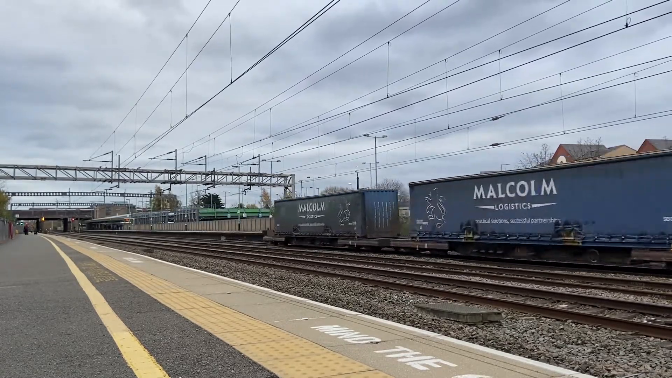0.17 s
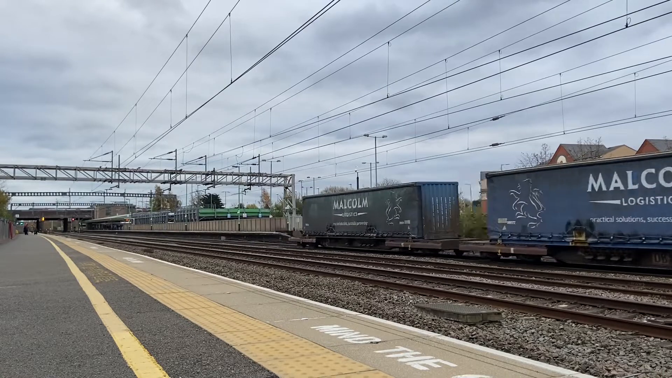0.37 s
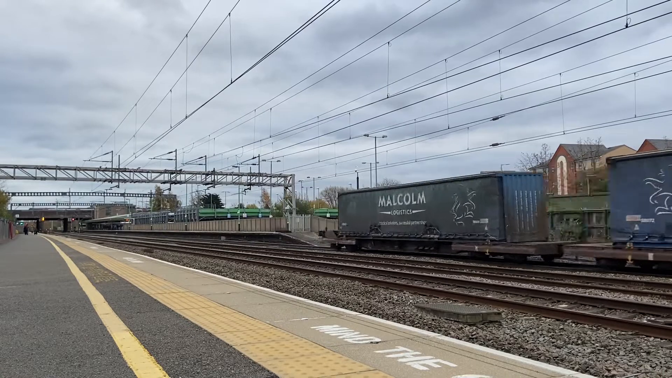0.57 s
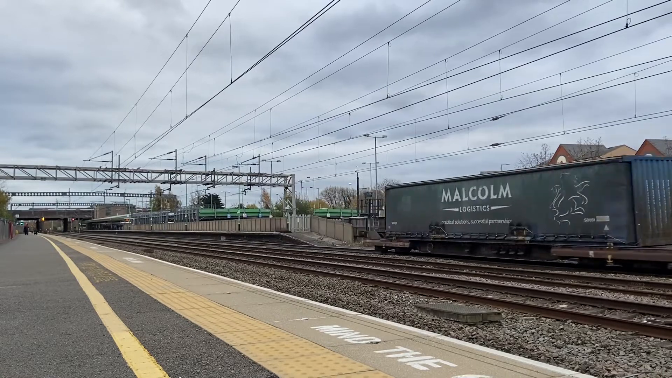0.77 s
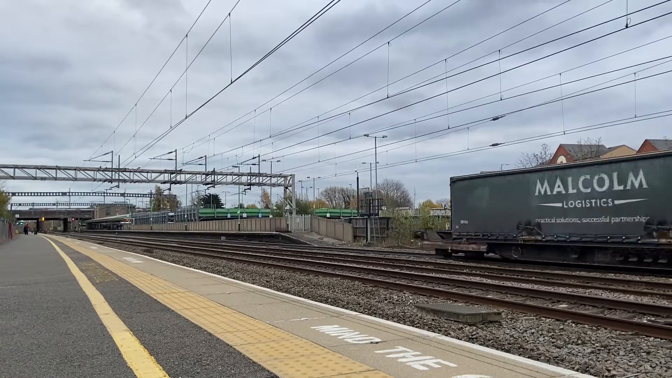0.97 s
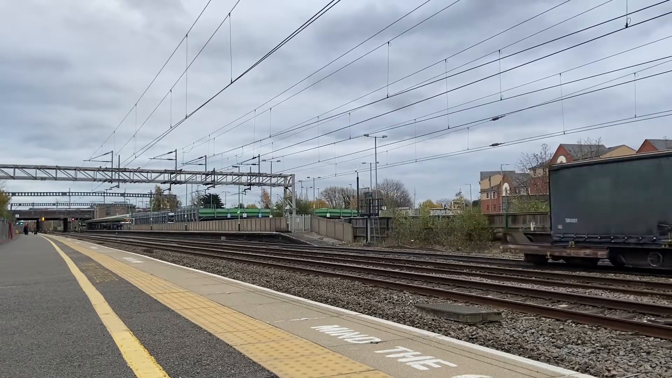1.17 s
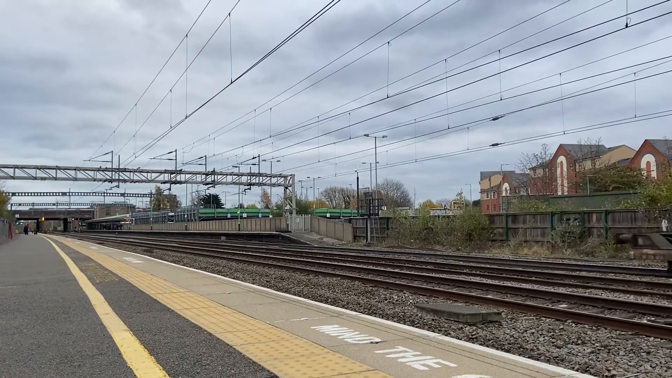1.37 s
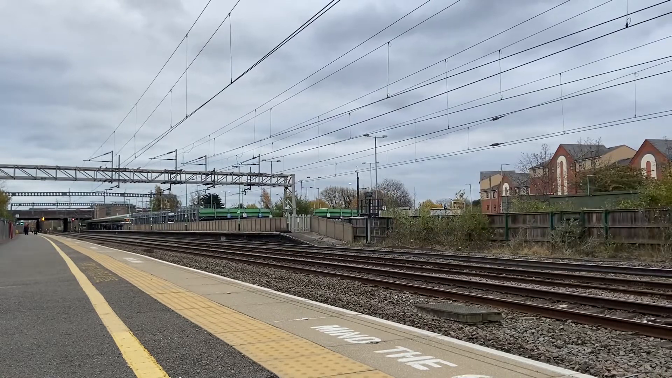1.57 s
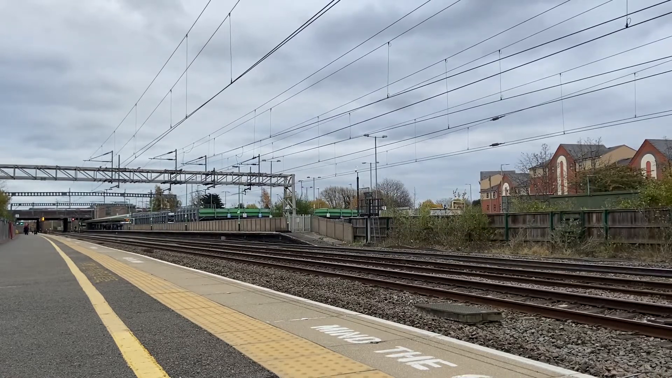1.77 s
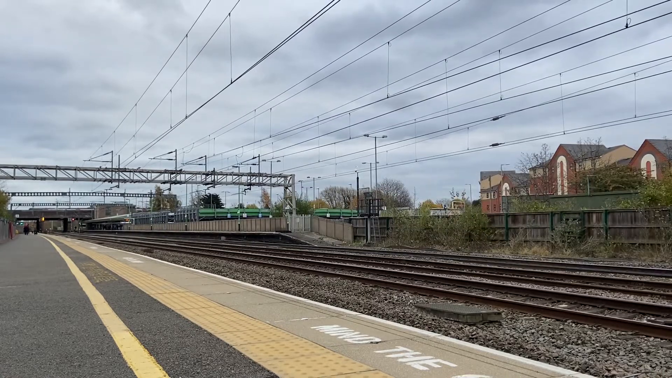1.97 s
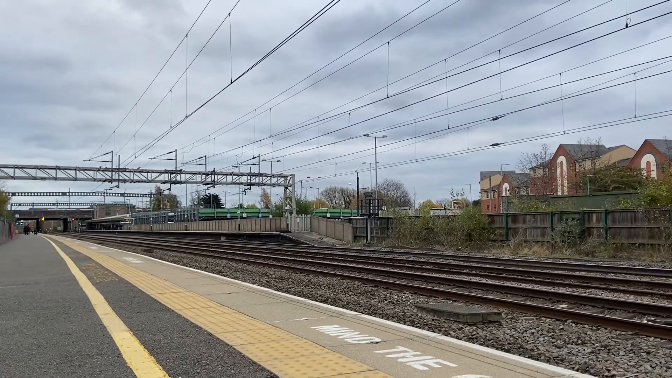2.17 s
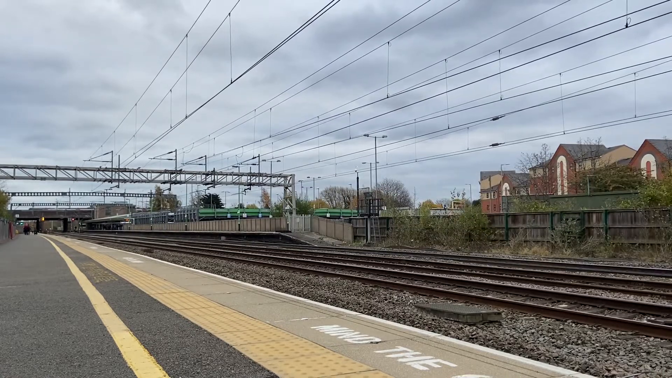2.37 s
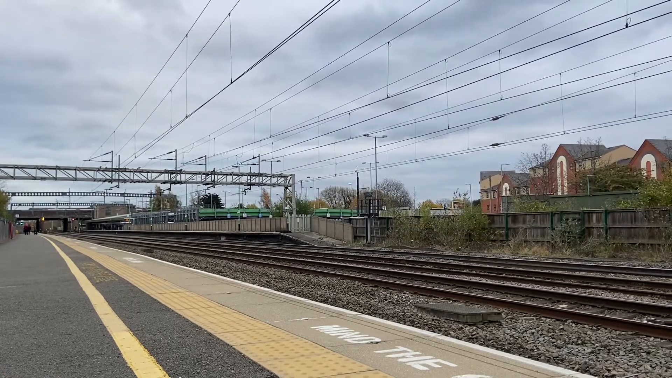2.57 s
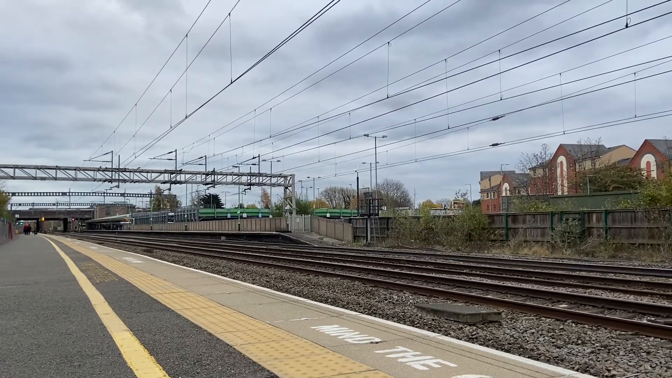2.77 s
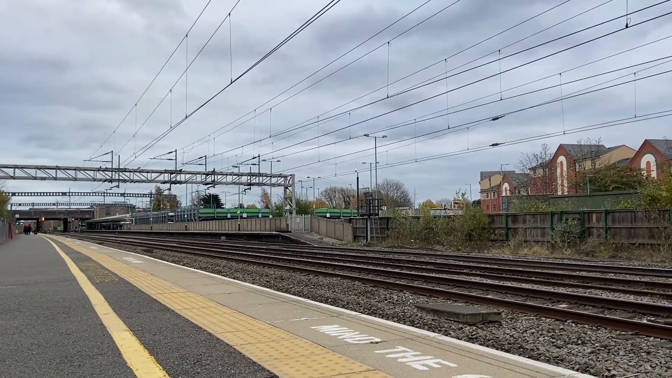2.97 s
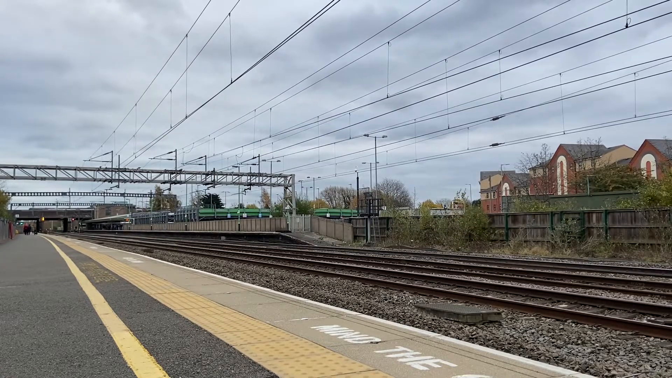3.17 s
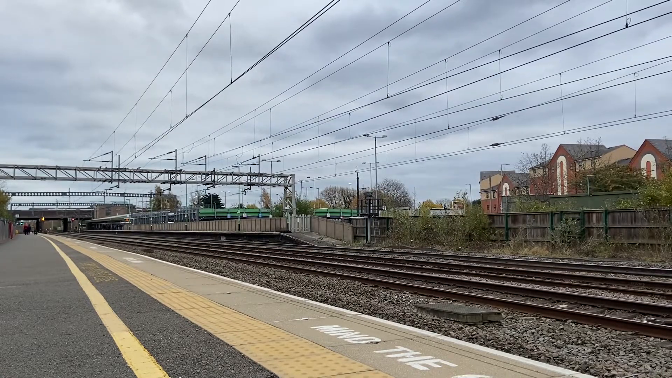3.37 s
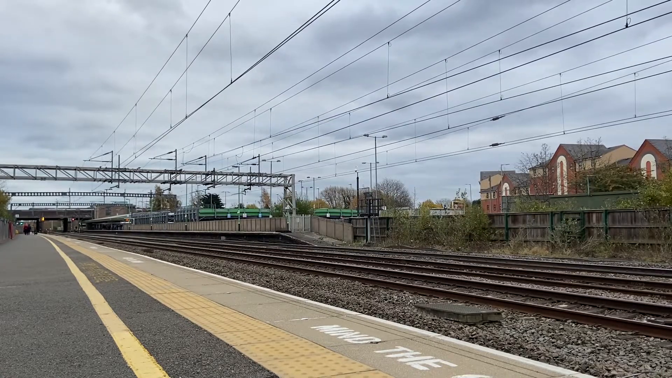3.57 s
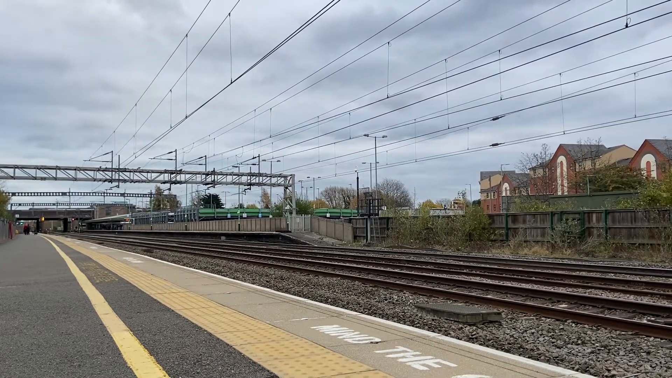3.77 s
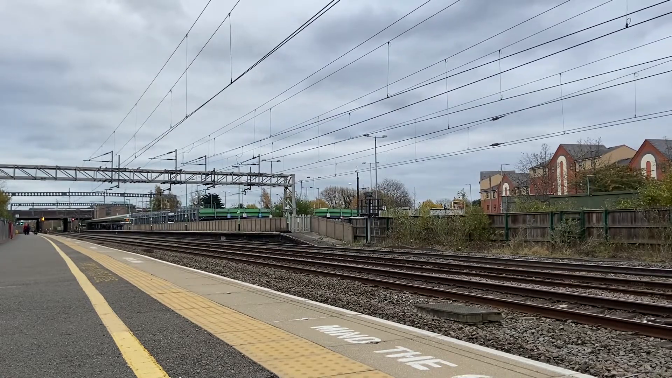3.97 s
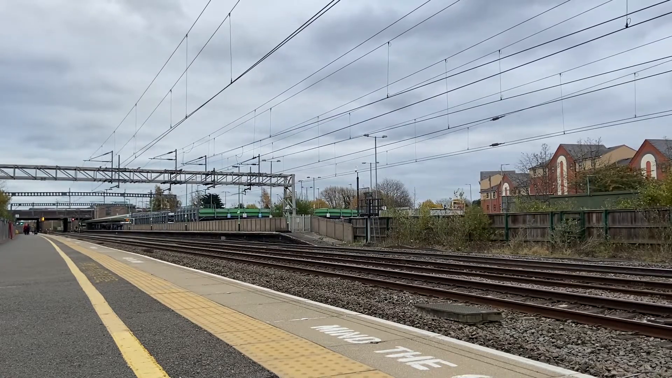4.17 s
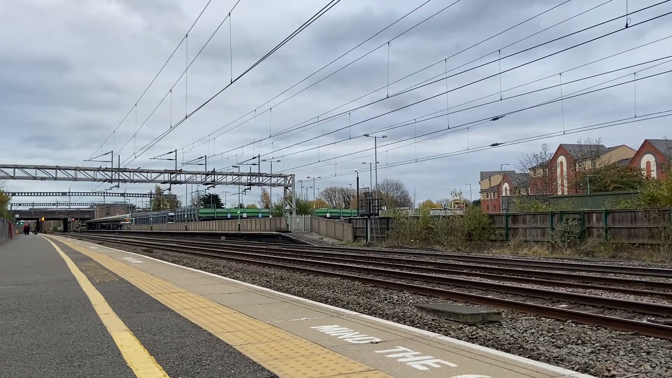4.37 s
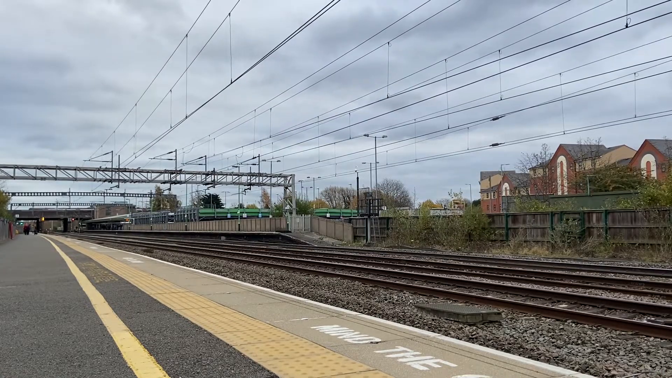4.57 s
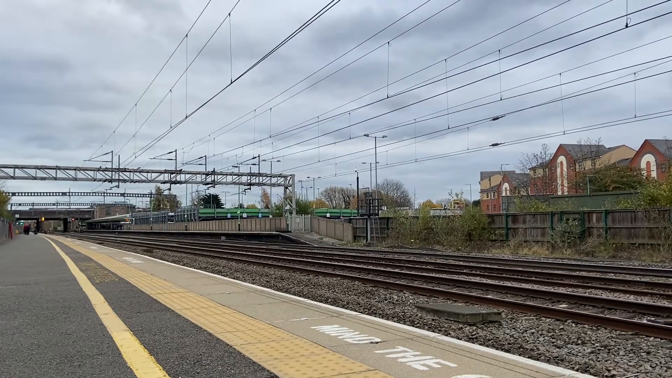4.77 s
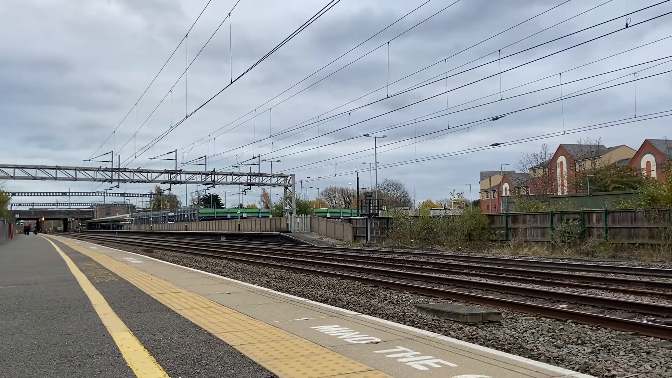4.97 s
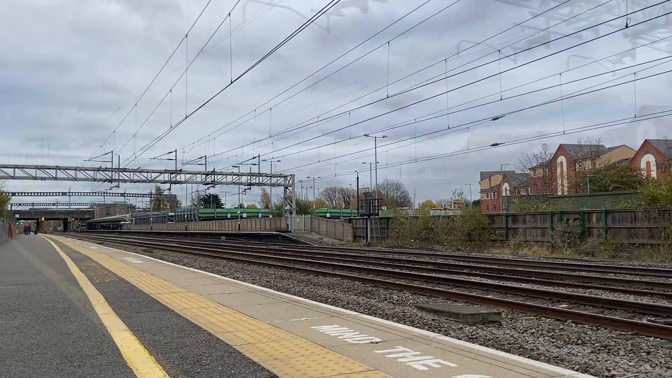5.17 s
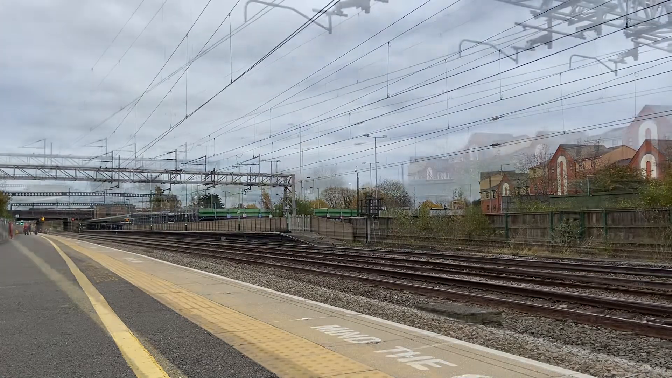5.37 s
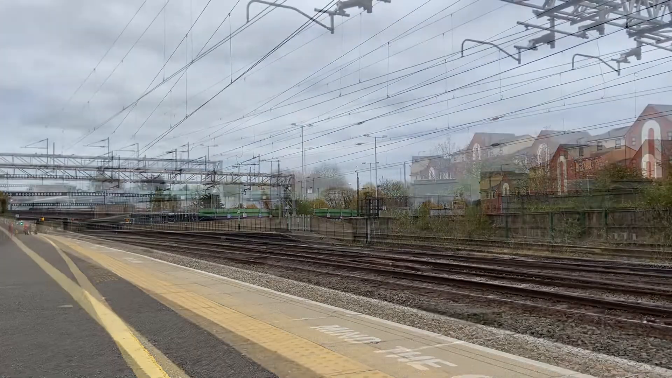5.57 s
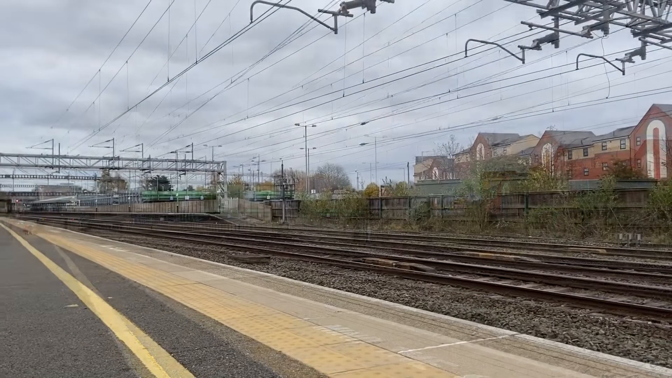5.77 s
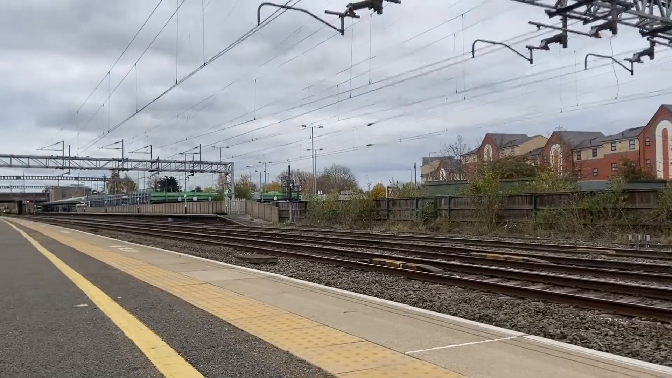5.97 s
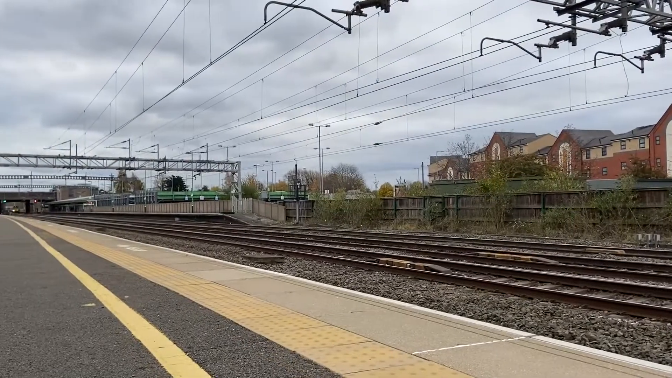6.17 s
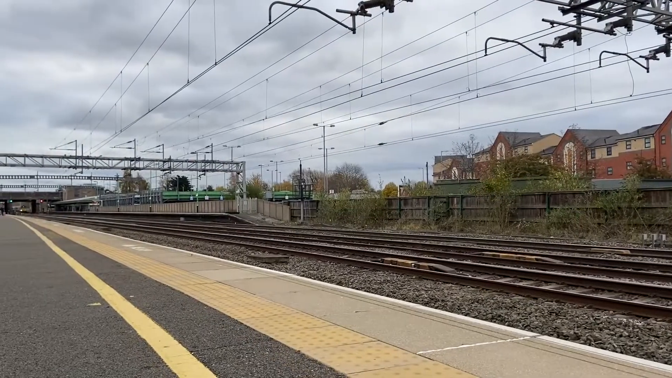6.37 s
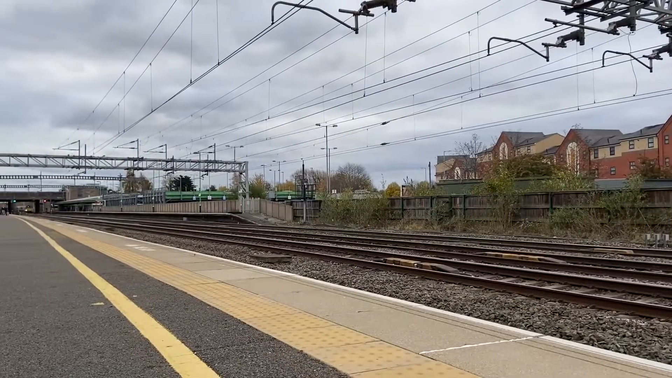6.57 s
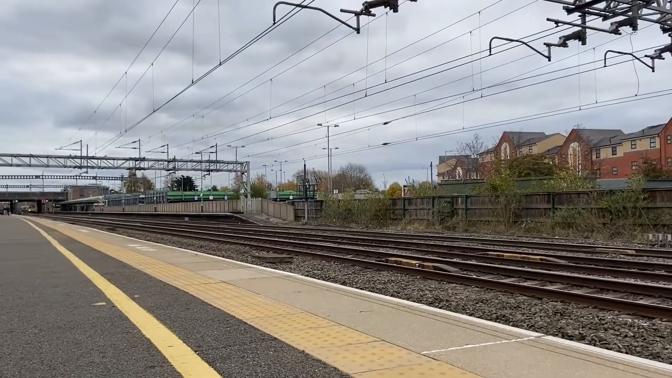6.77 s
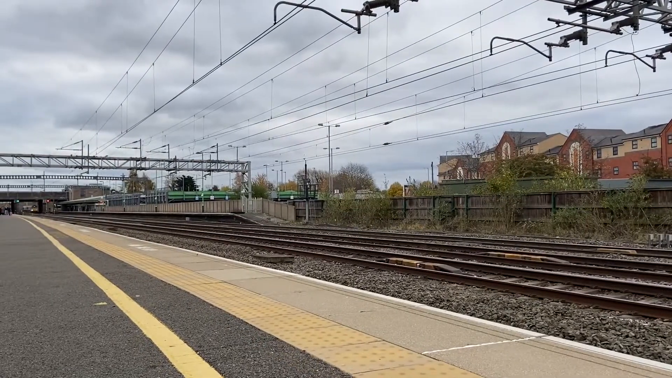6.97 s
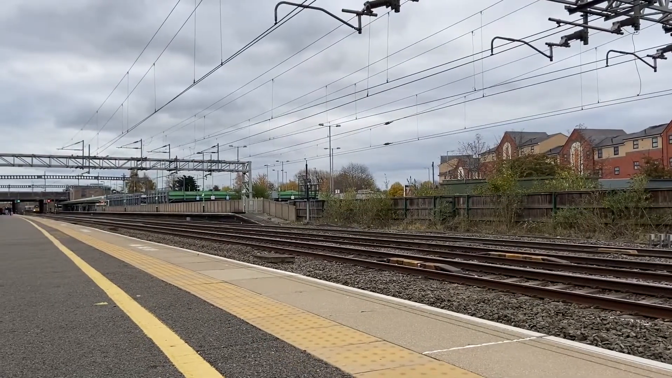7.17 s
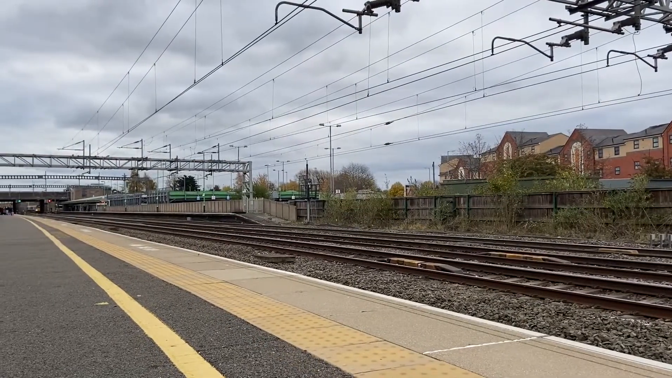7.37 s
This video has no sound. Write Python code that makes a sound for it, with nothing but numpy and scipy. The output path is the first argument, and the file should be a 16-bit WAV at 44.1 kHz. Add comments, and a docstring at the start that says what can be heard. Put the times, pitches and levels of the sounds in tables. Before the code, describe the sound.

Heavy wagon roar with dull wheel thumps peaks and rolls away, leaving faint station rumble, one close gritty footstep scuff and rising rail hiss.

```python
"""On a station platform, the last wagons of a freight train roll past and away to the right; the scene
then fades into the quiet station, where a shoe scuffs on grit close by and the rails begin to hiss ahead
of another train. Rolling is shaped noise, resonances are noise in narrow or broad modes, thumps are short
sines, and the shoe is a sum of decaying modes with sprays and short bands of filtered noise.
Two microphone ports a hand apart hear it all, the right one first."""
import sys
import numpy as np
from scipy import signal
from scipy.io import wavfile
from scipy.ndimage import uniform_filter1d

SR = 44100
rng = np.random.default_rng(int(sys.argv[2]) if len(sys.argv) > 2 else 0)


def file_out(sig):
    """Save sig as 16-bit WAV at sys.argv[1]."""
    # one column per channel
    cols = np.atleast_2d(sig).T
    # limit, then scale
    lim = np.clip(cols, -1, 1)
    pcm = np.round(lim * 32767).astype(np.int16)
    wavfile.write(sys.argv[1], SR, pcm)


N = 327651


def amp(db):
    """Decibel law: twenty decibels are a factor of ten in amplitude."""
    return 10 ** (np.asarray(db) / 20)


def evened(x):
    """Normalisation: scales a signal to unit root-mean-square."""
    return x / np.sqrt(np.mean(abs(x) ** 2) + 1e-20)


def columns(table, at, warp=np.asarray):
    """Interpolation: reads every column of a table at the given places."""
    first, *rest = np.transpose(table)
    return np.array([np.interp(warp(at), warp(first), column) for column in rest])


def add(mix, start_s, sound):
    """Superposition: adds a two-port sound to the mix, cut at its ends."""
    start = round(start_s * SR)
    part = mix[:, max(start, 0):start + sound.shape[1]]
    part += sound[:, max(-start, 0):][:, :part.shape[1]]


# How the two ports differ, for wagons alongside and for sound from far along the track.
# Columns: pitch_hz [Hz], likeness [0-1], left_lead [rad], left_minus_right [dB]
PORTS_ALONGSIDE = [(20, .97, -.1, 0), (90, .95, -.3, -.6), (170, .9, -.6, -1.4), (260, .82, -.9, -1.2),
                   (500, .71, -2.0, -1.5), (800, .76, -2.4, -2), (1500, .6, -2.8, -.5),
                   (1850, .3, -4.4, .3), (2300, .52, -5.9, .3), (3300, .3, -6.3, .3),
                   (5000, .35, -6.3, -.5), (8000, .3, -7.5, -.5), (9500, .5, -6.6, 0),
                   (11500, .92, -6.3, 0)]
PORTS_ALONG_TRACK = [(20, .96, -.1, 0), (90, .93, -.35, -.3), (260, .82, -1.2, -2), (500, .86, -2.4, -3),
                     (800, .76, -2.8, -4), (1300, .62, -3.2, -4), (2100, .5, -4.9, -2),
                     (3000, .25, -5.6, -.5), (6000, .25, -6.3, .3), (8500, .9, -6.3, 0)]


def ports_at(hz, near):
    """Spatial coherence: likeness, phase lead and balance of the ports, between near and far."""
    near_values = columns(PORTS_ALONGSIDE, hz, np.log1p)
    far_values = columns(PORTS_ALONG_TRACK, hz, np.log1p)
    return [near * a + (1 - near) * b for a, b in zip(near_values, far_values)]


# The freight train passes and recedes.
# Columns: time_s [s], level_db [dB relative to its loudest]
TRAIN_LEVEL = [(0, -2.5), (.6, -1), (1.15, 0), (1.6, -3), (1.9, -7.5), (2.4, -11.5), (3.0, -14.5),
               (4.2, -18.5), (5.0, -20), (5.9, -17)]
FADE_S = (5.07, 5.68)  # the freight scene fades into the station
NEAR_DB, NEAR_SPAN_DB = -3, 16  # above the first the colour is alongside; it turns far off over the span
STATION_NEAR = 0.45  # share of the near port pattern in the station (0-1)


def shares(t):
    """Distance cue by level: shares (0-1) of the near pattern and of the station."""
    station = np.interp(t, FADE_S, (0, 1))
    near = np.clip(1 + (columns(TRAIN_LEVEL, t)[0] - NEAR_DB) / NEAR_SPAN_DB, 0, 1)
    return (1 - station) * near + station * STATION_NEAR, station


def levels(parts, t):
    """Addition of powers: the freight train fading out, plus the station fading in and growing."""
    station = shares(t)[1]
    gains = []
    for top_db, fall_share, later_s, station_db, rise in parts:
        freight_db = top_db + fall_share * columns(TRAIN_LEVEL, t - later_s)[0]
        freight_gain = (1 - station) * amp(freight_db)
        station_gain = station * amp(station_db + rise * (t - FADE_S[1]))
        gains.append(np.hypot(freight_gain, station_gain))
    return gains


# Colour of the noise: wagons alongside, wagons far off, station afterwards.
# Columns: pitch_hz [Hz], density_db [relative dB per Hz; each slice is then set to its own level]
COLOUR_ALONGSIDE = [(15, -36), (28, 4), (59, 10), (86, 10.5), (123, -5.5), (162, -3.5), (237, -4.5),
                    (329, -13.5), (500, -15.5), (775, -19), (1000, -20), (1280, -27), (2240, -24.5),
                    (3100, -28.5), (3520, -30), (4050, -32.5), (6780, -38), (8300, -45.5), (10000, -28),
                    (14800, -49)]
COLOUR_FAR_OFF = [(15, -32), (28, -6.5), (65, 0.5), (108, -13.5), (204, -11.5), (262, -18), (430, -20),
                  (780, -18), (950, -21.5), (1220, -27), (2020, -24), (2950, -31.5), (3400, -30.5),
                  (6290, -35), (8300, -41.5), (14800, -34)]
COLOUR_STATION = [(15, -38), (28, -9), (59, -7.5), (133, -14), (171, -11.5), (260, -15.5), (373, -21),
                  (800, -20), (1300, -26), (2180, -26), (2550, -32.5), (3800, -36.5), (6800, -36),
                  (8300, -51), (14800, -39)]


def band(size, edges_hz, parts, ring_db, waver_db):
    """Short-time synthesis: dense noise, one part for each slice; long frames resolve the bass."""
    hop, bins = size // 4, np.fft.rfftfreq(size, 1 / SR)
    used = (bins > edges_hz[0]) & (bins <= edges_hz[-1])
    t, hz = np.arange(N // hop + 5) * hop / SR, bins[used]

    near, station = np.array(shares(t))[:, :, None]
    colours = (COLOUR_ALONGSIDE, COLOUR_FAR_OFF, COLOUR_STATION)
    alongside, far, later = (columns(colour, hz, np.log1p)[0] for colour in colours)
    freight_colour = near * alongside + (1 - near) * far
    gain = amp(station * later + (1 - station) * freight_colour)
    for k, level in enumerate(levels(parts, t)):
        inside = np.searchsorted(edges_hz, hz) - 1 == k
        gain[:, inside] *= (level / np.linalg.norm(gain[:, inside], axis=1))[:, None]

    a, b, c, d, patches = rng.standard_normal((len(t), len(hz), 5)).transpose(2, 0, 1)
    # countless small modes ring up and die
    patches = uniform_filter1d(patches, size=9, axis=0)
    patches = evened(uniform_filter1d(patches, size=2, axis=1))
    # slow random wavering of the whole band
    waver = evened(uniform_filter1d(rng.standard_normal(len(t)), size=6))[:, None]
    gain = gain * amp(ring_db * np.clip(patches, 0, 2.8) ** 2 + waver_db * waver)

    same, lead, pan_db = ports_at(hz, near)
    same, left, right = np.clip(same, 0, 1), amp(pan_db / 2), amp(-pan_db / 2)
    # dividing by the level of the ports' average keeps that average at the wanted gain
    middle = np.sqrt(left ** 2 + right ** 2 + 2 * same * np.cos(lead)) / 2
    shared, own = a + 1j * b, c + 1j * d
    left_port = left * np.exp(1j * lead) * shared
    right_port = right * (same * shared + np.sqrt(1 - same ** 2) * own)
    pair = np.zeros((2, len(t), len(bins)), complex)
    pair[:, :, used] = gain / middle * np.array([left_port, right_port])
    return signal.istft(pair.transpose(0, 2, 1), nperseg=size, noverlap=size - hop)[1][:, :N]


# Parts of the rolling noise, one row for each slice between the edges; levels before ringing and wavering.
# Columns: top_db [dB], fall_share [share of the train's fall it follows], later_s [s],
# station_db [dB at the end of the fade], rise [dB per s, ahead of the next train]
GROUND_PARTS = [(-20.5, 0.78, 0.16, -47, 5.5)]
BODY_RAIL_PARTS = [(-21, 1.188, 0.12, -48, 1.9), (-24, 0.9, 0.033, -48.5, 1.2)]
DISC_HISS_PARTS = [(-29, 1.097, 0.0068, -52.5, 2.7), (-37, 1.053, 0.1, -62, 3.4)]
FINE_PARTS = [(-51.5, 0.67, -0.25, -71, 4.4)]
RUMBLE_HZ, ROAR_HZ = (15, 125), (125, 330, 1400)
WHEELS_HZ, FINE_HZ = (1400, 4200, 8500), (8500, 15200)
# The bass swells and sinks beside the train's level.
# Columns: time_s [s], gain_db [dB]
BASS_GAIN = [(0, -3.5), (1.2, -3), (1.6, -1.5), (2.2, -2), (3.1, -4.5), (3.45, 1), (4.4, -7.5), (4.95, 2.5),
             (5.5, 2), (6.6, 0), (6.9, 1.5), (7.2, -4.5), (7.43, 7)]


def rolling():
    """Roughness excitation: rough wheels on rough rail, duller and further aside with distance."""
    rumble = band(size=4096, edges_hz=RUMBLE_HZ, parts=GROUND_PARTS, ring_db=0.93, waver_db=-1.5)
    roar = band(size=2048, edges_hz=ROAR_HZ, parts=BODY_RAIL_PARTS, ring_db=0.9148, waver_db=.55)
    wheels = band(size=2048, edges_hz=WHEELS_HZ, parts=DISC_HISS_PARTS, ring_db=.95, waver_db=.6)
    fine = band(size=1024, edges_hz=FINE_HZ, parts=FINE_PARTS, ring_db=.6, waver_db=1.7)
    swell = amp(columns(BASS_GAIN, np.arange(N) / SR))
    return swell * rumble + roar + wheels + fine


# Rings and resonances of the rolling noise, short or lasting seconds.
# Levels of rings, whine and hiss are those at the middle of the swell.
# Columns: middle_s [s], length_s [s], pitch_hz [Hz], width_hz [Hz], level_db [dB]
RESONANCES = [(.13, .55, 1848, 30, -36), (.1, .6, 1950, 500, -32), (0.39, .25, 3660, 50, -42.5),
              (.6, .3, 2200, 200, -37), (0.717, .12, 2400, 120, -35), (0.672, .14, 388, 30, -23.5),
              (.96, .2, 3450, 120, -39), (1.041, .15, 770, 30, -20), (1.13, .15, 850, 28, -19.5),
              (1.13, .22, 3570, 300, -35), (1.0, .7, 3540, 450, -39), (1.22, .3, 3400, 40, -41),
              (1.45, .25, 3640, 40, -45), (.4, .9, 6580, 120, -53), (1.2, 1.1, 775, 110, -26),
              (1.2, 0.75, 2750, 330, -34), (1.26, .32, 2240, 40, -33), (1.5, .3, 786, 73, -25),
              (1.549, .3, 2400, 400, -38), (1.83, .5, 2070, 120, -41), (2.58, .3, 2010, 90, -49),
              (2.1, 1.4, 2060, 400, -43.5), (1.75, .3, 3300, 100, -47), (2.2, 1.6, 3330, 190, -53),
              (4.0, 2.6, 3230, 120, -62.5), (3.9, 2.8, 4160, 150, -62.5), (4.3, 2.0, 5170, 130, -66),
              (2.883, .9, 1357, 12, -52), (4.798, 1.6, 7200, 290, -70), (5.1, .8, 790, 300, -40.5),
              (6.2, 2.4, 3814, 3, -70), (6.8, 1.8, 4010, 45, -67), (6.8, 1.4, 3715, 25, -66),
              (7.0, .35, 167.6, 14, -43.5), (6.93, .15, 2150, 72, -55), (2.72, .2, 323, 40, -41),
              (7.38, .4, 2178, 20, -51), (7.15, 1.0, 2165, 90, -57)]
# A thin high whine comes and goes.
# Columns: middle_s [s], length_s [s], level_db [dB]
WHINE_SWELLS = [(2.05, .3, -66), (3.2, 1.7, -62), (4.7, 1.3, -66)]
WHINE_HZ, WHINE_WIDTH_HZ = 13474, 10
# Brief high hiss.
# Columns: middle_s [s], length_s [s], pitch_hz [Hz], level_db [dB]
HISS_SWELLS = [(1.576, 0.074, 8900, -42.5), (6.964, 0.48, 11900, -59.5), (7.18, 0.098, 11900, -60),
               (7.35, 0.26, 12000, -61)]
HISS_WIDTH_HZ = 1500


def rings():
    """Resonance: each ring, whine or hiss is noise in one mode that swells and dies."""
    out = np.zeros((2, N))
    whine = [(s, length, WHINE_HZ, WHINE_WIDTH_HZ, db) for s, length, db in WHINE_SWELLS]
    hisses = [(s, length, hz, HISS_WIDTH_HZ, db) for s, length, hz, db in HISS_SWELLS]
    for middle_s, length_s, hz, width, db in RESONANCES + whine + hisses:
        t = np.arange(round(length_s * SR)) / SR
        r = np.exp(-np.pi * width / SR)  # pole radius sets the bandwidth
        a, b = rng.standard_normal((2, 3 * SR + 9000))
        wander = evened(signal.lfilter([1], [1, -2 * r, r * r], a + 1j * b))
        # the narrower the mode, the steadier its tone; the filter's start is skipped
        slow = evened(14 / (width + 5) + wander)[9000:][:len(t)]
        _, lead, pan_db = ports_at(hz, shares(middle_s)[0])
        sides = np.array([[amp(pan_db / 2) * np.exp(1j * lead)], [amp(-pan_db / 2)]])
        tone = (sides * slow * np.exp(2j * np.pi * hz * t)).real
        add(out, middle_s - length_s / 2, amp(db) * np.sqrt(2) * tone * np.hanning(len(t)))
    return out


# Dull thumps from the wheels.
# Columns: start_s [s], level_db [dB, peak of the envelope], pitch_hz [Hz]
WHEEL_THUMPS = [(0.328, -16, 230), (0.487, -18, 202), (0.581, -12.5, 186), (0.711, -23, 173),
                (0.739, -15, 64.6), (0.925, -12, 85), (1, -13.5, 225), (1.035, -14, 216),
                (1.151, -15.5, 162), (1.248, -16, 170), (1.38, -17, 71.4), (1.17, -24, 70),
                (1.261, -8.5, 85), (1.328, -15, 175), (1.605, -14, 75), (1.689, -10.5, 72),
                (4.667, -26, 65.6), (4.907, -27.5, 73.5), (4.964, -27, 78.5), (5.03, -23, 58.5),
                (5.578, -30, 54.7), (6.019, -32, 105)]
THUMP_S = 0.0052  # rise of a thump to its peak


def thumps():
    """Damped impulse response: a soft push of slow cycles, alike at both ports."""
    out, t = np.zeros((2, N)), np.arange(4000) / SR
    envelope = t / THUMP_S * np.exp(1 - t / THUMP_S)
    for start_s, db, hz in WHEEL_THUMPS:
        push = np.sin(2 * np.pi * hz * t) * envelope
        add(out, start_s, amp(db) * np.ones((2, 1)) * push)
    return out


# Shoe on grit, one row a crunch.
# Columns: start_s [s], knock_db [dB, envelope peak of the fundamental],
# grit_db [dB, white noise before its filter and envelope], pitch_hz [Hz, of the knock], grit_hz [Hz, centre]
GRIT_CRUNCHES = [(6.143, -54, -47, 500, 7000), (6.2655, -32, -30, 800, 2800),
                 (6.2698, -18.5, -30, 770, 4300), (6.277, -37, -23, 900, 2800),
                 (6.2782, -50, -32, 900, 6300), (6.2835, -34, -33, 620, 2600),
                 (6.2955, -33, -33, 760, 5500), (6.303, -32, -37, 480, 4500), (6.355, -33, -46, 260, 2000),
                 (6.386, -38, -47, 633, 2500), (6.396, -35, -45, 724, 2500), (6.407, -35, -32, 620, 4500),
                 (6.41, -34, -31, 640, 4500), (6.4135, -32, -35, 400, 4000), (6.487, -42, -35, 719, 3400)]
# Modes of the sole.
# Columns: multiple [of the pitch], level_db [dB, before the loss per cycle]
SOLE_MODES = [(1, 0), (1.7, -10), (2.5, -1), (.6, -6)]
# Short bands of noise under the shoe: scuffs and a knock's ringing.
# Columns: middle_s [s], length_s [s], low_hz [Hz], high_hz [Hz], level_db [dB, mean of the ports]
SHOE_BANDS = [(6.296, .07, 250, 900, -39), (6.387, .04, 540, 740, -37.5), (6.415, .06, 200, 850, -46)]
GRIT_RISE_S, GRIT_T60_S = .0012, .03
GRIT_SPREAD = 1.35  # ratio of the band's edges to its centre
SHOE_PAN_DB, LEFT_DELAY_S = -4, .00015  # left minus right; the right port leads
KNOCK_PEAK_CYCLE, KNOCK_START = 1.75, .7  # peaks at this cycle; starts this share above its pitch
OVERTONE_LOSS_DB = 2.5  # per cycle and per multiple above the pitch; lower modes gain instead


def shoe():
    """Impact and friction: each crunch knocks the sole and sprays grit; short noise bands lie beneath."""
    out, t = np.zeros((2, N)), np.arange(1500) / SR
    sides = amp(np.array([[SHOE_PAN_DB / 2], [-SHOE_PAN_DB / 2]]))
    for start_s, db, grit_db, hz, grit_hz in GRIT_CRUNCHES:
        turns = hz * t + KNOCK_START * (1 - np.exp(-hz * t))
        modes = sum(amp(mode_db - OVERTONE_LOSS_DB * (k - 1) * turns) * np.sin(-2 * np.pi * k * turns)
                    for k, mode_db in SOLE_MODES)
        progress = turns / KNOCK_PEAK_CYCLE
        knock = modes * amp(db) * (progress * np.exp((1 - progress ** 2.5) / 2.5)) ** 2

        grit_band = (grit_hz / GRIT_SPREAD, grit_hz * GRIT_SPREAD)
        grit = signal.butter(2, grit_band, "bandpass", fs=SR, output="sos")
        decay = amp(grit_db - 60 * t / GRIT_T60_S)
        rise = 1 - np.exp(-t / GRIT_RISE_S)
        spray = signal.sosfilt(grit, rng.standard_normal((2, len(t)))) * decay * rise

        sound = sides * (knock + spray)
        add(out, start_s, sound * [[0], [1]])
        add(out, start_s + LEFT_DELAY_S, sound * [[1], [0]])
    for middle_s, length_s, low_hz, high_hz, db in SHOE_BANDS:
        bandpass = signal.butter(2, (low_hz, high_hz), "bandpass", fs=SR, output="sos")
        noise = evened(signal.sosfilt(bandpass, rng.standard_normal(SR)))[-round(length_s * SR):]
        fade = signal.windows.tukey(len(noise), .6)
        add(out, middle_s - length_s / 2, amp(db) * sides * noise * fade)
    return out


def scene():
    """Superposition: all sources add linearly at the two ports."""
    return rolling() + rings() + thumps() + shoe()


LOW_CUT_HZ = 39
EDGE_HZ, EDGE_TAPS = 14750, 601


def record(dry):
    """Band limitation: small microphones lose the deepest bass, the recorder the highest treble."""
    low_cut = signal.butter(4, LOW_CUT_HZ, "highpass", fs=SR, output="sos")
    thinned = signal.sosfilt(low_cut, dry)
    edge = signal.firwin(EDGE_TAPS, EDGE_HZ, window=("kaiser", 9), fs=SR)
    return signal.oaconvolve(thinned, edge[None], "same")


dry = scene()
out = record(dry)
file_out(out)
```